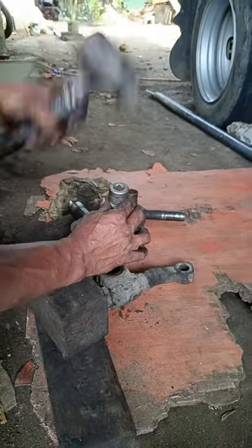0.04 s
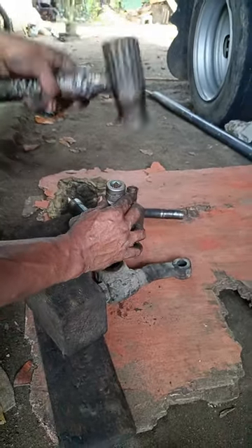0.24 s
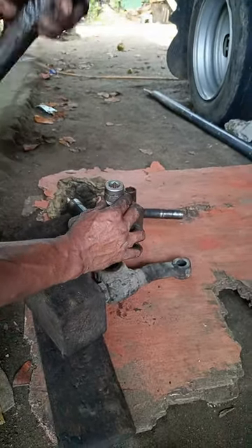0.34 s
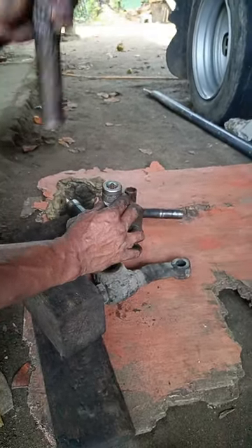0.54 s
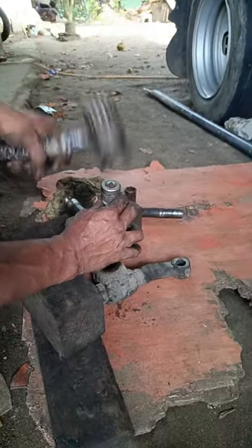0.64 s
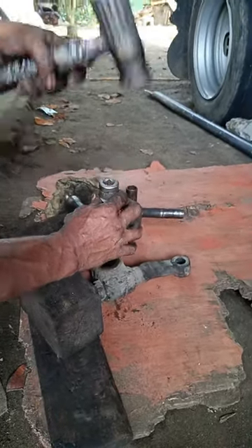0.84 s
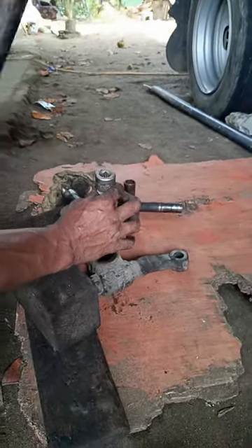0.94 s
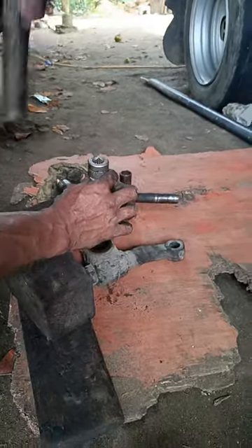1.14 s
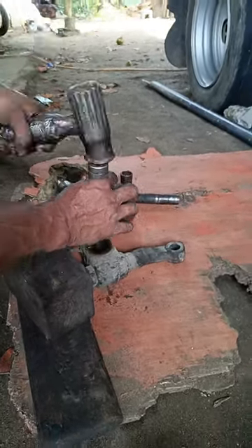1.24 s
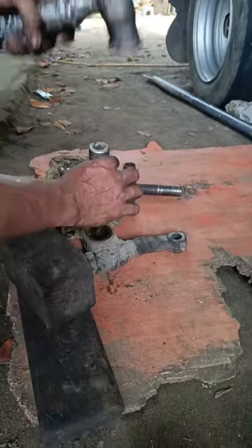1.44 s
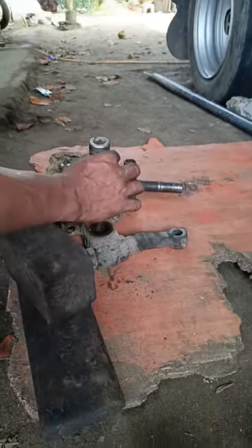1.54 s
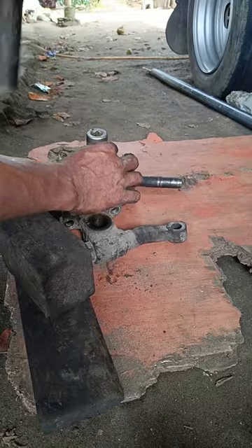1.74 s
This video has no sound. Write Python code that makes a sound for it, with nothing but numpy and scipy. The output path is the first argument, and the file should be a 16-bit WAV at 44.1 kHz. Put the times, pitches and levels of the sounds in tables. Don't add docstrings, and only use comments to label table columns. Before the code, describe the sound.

Three heavy hammer blows on a steel socket, at about 0.2, 0.8 and 1.4 seconds: each a loud, slightly overloaded crack with a falling zip, gritty rattle, low block boom and brief bright ring. The casting bounces with dull knocks, notably near 0.57. A faint bird chirps at 0.1; a loose tool clinks at 1.14. Wind thumps softly; short open-shed reverberation, background dipping around each blow.

```python
import sys
import numpy as np
from scipy import signal
from scipy.fft import rfft, irfft, next_fast_len
from scipy.io import wavfile
from scipy.ndimage import map_coordinates

SR = 44100
rng = np.random.default_rng(int(sys.argv[2]) if len(sys.argv) > 2 else 0)


def volts_from_decibels(level):
    exponent = np.asarray(level, float) / 20
    return 10 ** exponent


def wav_out(sig):
    wavfile.write(sys.argv[1], SR, np.round(np.clip(np.atleast_2d(sig).T, -1, 1) * 32767).astype(np.int16))


N = 79380


def unit(x):
    return x / np.sqrt(np.mean(x ** 2) + 1e-20)


def along(points, hz):
    f, v = np.transpose(points)
    return np.interp(np.log(hz + 1), np.log(f + 1), v)


def wobble(rate):
    knots = rng.standard_normal(int(N * rate / SR) + 4)
    return map_coordinates(knots, [np.arange(N) * rate / SR])


def filtered(x, response):
    m = next_fast_len(N + SR // 2)
    return irfft(rfft(x, m) * response(np.fft.rfftfreq(m, 1 / SR)), m)[..., :N]


def peak(hz, centre, width):
    return 1 / (1 + (2 * (hz - centre) / width) ** 2)


def dying(s, t60, rise):
    t = np.maximum(np.arange(N) / SR - s, 0)
    return (1 - np.exp(-t / rise)) * volts_from_decibels(-60 * t / t60)


# (frequency [Hz], likeness [0-1])
PORT_LIKENESS = [(100, 0.91), (350, 0.95), (800, 0.32), (3000, 0.027), (12000, 0.034)]


def noise(colour):
    def mid_side(hz):
        turn = np.arccos(np.clip(along(PORT_LIKENESS, hz), -1, 1)) / 2
        return colour(hz) * [np.cos(turn), np.sin(turn)]
    mid, side = filtered(rng.standard_normal((2, N)), mid_side)
    return unit(np.array([mid + side, mid - side]))


def ringing(s, modes, damp, rise, smear):
    rate, depth, spread_db = smear
    length_s, port_turn_hz = 0.6, 2560
    start, out = round(s * SR), np.zeros((2, N + SR))
    t = np.arange(int(length_s * SR)) / SR
    knots = np.arange(int(length_s * rate) + 2) / rate
    for hz, db, t60 in modes:
        a, b = depth * rng.standard_normal((2, len(knots)))
        shake = np.interp(t, knots, 1 + a + 1j * b) / np.sqrt(1 + depth ** 2)
        split = np.clip(hz / port_turn_hz, 0, 1) * rng.choice([-1, 1]) * np.array([[1], [-1]]) / 8
        ports = np.exp(2j * np.pi * (rng.random() + split))
        decay = np.log(1000) / (t60 * damp)
        tone = shake * np.exp((2j * np.pi * hz - decay) * t) * (1 - np.exp(-t / rise))
        level = volts_from_decibels(db + spread_db * np.tanh(rng.normal()))
        out[:, start:start + len(t)] += level * np.imag(ports * tone)
    return out[:, :N]


# (time [s], level [dB])
WIND_STRENGTH = [(0.0, -43), (0.234, -32.5), (0.28, -55), (0.476, -36.5), (0.55, -46), (0.686, -33),
                 (0.762, -45.5), (0.806, -8), (0.832, -48), (1.026, -29), (1.072, -38.5), (1.231, -27.5),
                 (1.252, -36.5), (1.318, -35), (1.342, -56), (1.382, -53), (1.408, -42), (1.8, -33.5)]
# (frequency [Hz], density [dB])
WIND_COLOUR = [(20, -42), (45, -10), (85, 5), (140, -0.5), (200, -10), (350, -20.5), (600, -42),
               (1200, -69)]
# (frequency [Hz], density [dB])
YARD_COLOUR = [(100, -24), (250, -1), (600, -10.5), (1100, -17.5), (2500, -20), (4500, -22.5), (6000, -32),
               (14000, -46)]
# (time [s], level [dB])
YARD_SWELL = [(0, 2), (.2, -1), (.55, 5), (.7, 2.5), (.8, 1), (1.3, 1), (1.8, 2)]


def air():
    t = np.arange(N) / SR
    left_db, lumps_db, yard_db, sway_db = 2.5, 2, -52.5, 1.2
    rumble = unit(filtered(rng.standard_normal((2, N)), lambda hz: volts_from_decibels(along(WIND_COLOUR, hz))))
    lumps = lumps_db * np.array([wobble(14), wobble(12.4)])
    wind_db = np.interp(t, *np.transpose(WIND_STRENGTH)) + lumps + [[left_db], [-left_db]]
    swell_db = yard_db + np.interp(t, *np.transpose(YARD_SWELL)) + sway_db * wobble(7.9)
    return volts_from_decibels(wind_db) * rumble + volts_from_decibels(swell_db) * noise(lambda hz: volts_from_decibels(along(YARD_COLOUR, hz)))


# (time [s], length [s], from [Hz], to [Hz], level [dB], octave level [dB])
BIRD_NOTES = [
    (.102, 0.016, 2620, 3170, -58.5, -7),
    (0.128, 0.044, 3050, 3220, -59, -16),
    (0.13, 0.026, 3300, 3390, -57, -4),
    (0.133, 0.051, 3735, 3900, -53.5, -14.5),
]


def bird():
    t, out = np.arange(N) / SR, np.zeros(N)
    for s, length, hz0, hz1, db, octave_db in BIRD_NOTES:
        u = np.clip((t - s) / length, 0, 1)
        glide = hz0 + (hz1 - hz0) * (1 - (1 - u) ** 2)
        phase = 2 * np.pi * np.cumsum(glide * (1 + 0.0358 * wobble(360))) / SR
        twelfth = 0.67 * np.sin(3 * phase) * (hz1 < 3300)
        voice = np.sin(phase) + volts_from_decibels(octave_db) * (np.sin(2 * phase) + twelfth)
        out += volts_from_decibels(db) * np.sqrt(np.abs(np.sin(np.pi * u))) * (u < 1) * voice
    return out


# (time [s], level [dB], pitch [Hz], t60 [s])
GUSTS = [
    (0.139, -26.5, 82, 0.15),
    (.668, -29.5, 108, 0.14),
    (0.729, -42, 102, 0.092),
    (0.931, -24, 89, 0.13),
    (1.207, -29, 90.3, 0.22),
    (1.301, -28, 86.5, .1),
]


def buffets():
    t, out, left_db = np.arange(N) / SR, np.zeros((2, N)), 9
    for s, db, hz, t60 in GUSTS:
        thump = np.sin(2 * np.pi * hz * (t - s + [[0], [0.003]]))
        out += volts_from_decibels(db) * thump * dying(s, t60, 0.0063)
    return out * volts_from_decibels([[left_db], [-left_db]])


DUCK_DB = 19
# (time [s], peak [dB], gain control lead [s], rattle t60 [s], steel left to ring [0-1])
BLOWS = [
    (0.2059, -10, 0.029, 0.21, 0.89),
    (0.7874, -9, 0.027, 0.19, 0.92),
    (1.37, -10.5, .014, 0.21, 0.95),
]
# (centre [Hz], width [Hz], level [dB], t60 [s])
CRACKS = [(2060, 3200, -3.5, 0.077), (1360, 1800, -3.5, 0.044), (1460, 2300, -5.5, 0.042)]
# (from [Hz], to [Hz], level [dB], t60 [s])
ZIPS = [(5820, 2320, 2.5, .01), (5870, 2420, 4, 0.014), (5560, 2970, 4.5, 0.013)]
# (frequency [Hz], density [dB])
RATTLE_COLOUR = [(60, -39), (150, -1.5), (400, 4), (1140, -9), (1700, -13), (4140, -9.5), (9210, -18),
                 (16000, -40)]
# (frequency [Hz], width [Hz], level [dB])
PARTS = [(1178, 234, 12.5), (2173, 128, 14), (2720, 490, 8.5), (3420, 130, 8), (4330, 500, 6),
         (4900, 400, -12), (6720, 92, -26), (9100, 1600, 8), (14600, 1250, 17.5)]
# (frequency [Hz], level [dB], t60 [s])
BLOCK_MODES = [(190.4, -12, 0.305), (249.8, -12.5, 0.49), (313, 2, 0.41), (351.9, 2.5, 0.46),
               (421.7, 5.5, 0.37), (511.4, -4.5, 0.41), (580, -1, 0.17), (794, -6, 0.33)]
BLOCK_BLOW_DB = [-0.5, -2.5, -2.5]
# (rate [1/s], depth [ratio], level spread [dB])
BLOCK_SMEAR = (40, 1.6, 3)


def hammer():
    rattle_db, grit_db, grit_rate, block_db = -2, 3, 500, -19.5
    settle, settle_s = 0.34, 0.0084
    zip_fall_s = 0.00194

    def colour(hz):
        parts = sum(volts_from_decibels(db) * peak(hz, centre, width) for centre, width, db in PARTS)
        return volts_from_decibels(along(RATTLE_COLOUR, hz)) * (1 + parts)

    out = np.zeros((2, N))
    for blow, contact, bend, boom_db in zip(BLOWS, CRACKS, ZIPS, BLOCK_BLOW_DB):
        s, db, ahead, t60, ring = blow
        centre, width, crack_db, crack_t60 = contact
        hz0, hz1, zip_db, zip_t60 = bend
        t = np.maximum(np.arange(N) / SR - s, 0)
        turns = hz1 * t + (hz0 - hz1) * zip_fall_s * (1 - np.exp(-t / zip_fall_s))
        sweep = np.sin(2 * np.pi * turns + [[0.6], [-0.6]]) * dying(s, zip_t60, 0.00037)
        crack = noise(lambda hz: peak(hz, centre, width)) * dying(s, crack_t60, 0.0006)
        builds = 1 - settle * np.exp(-t / settle_s)
        grit = volts_from_decibels(rattle_db + grit_db * wobble(grit_rate))
        rattle = grit * noise(colour) * dying(s, t60, 0.00028) * builds
        boom = volts_from_decibels(block_db + boom_db) * ringing(s, BLOCK_MODES, 0.97, 0.0052, BLOCK_SMEAR)
        out += volts_from_decibels(db + DUCK_DB) * (volts_from_decibels(zip_db) * sweep + volts_from_decibels(crack_db) * crack + rattle + boom)
    return out


# (frequency [Hz], t60 [s], blow 1 level [dB], blow 2 level [dB], blow 3 level [dB])
STEEL_MODES = [(1193, 0.41, -5, -9, -11.5), (2158, 0.39, -1, -4.5, -12), (2463, 0.38, -2, 3, -4.5),
               (2815, 0.32, -8, -6, -2), (2882, 0.43, -4, -3.5, -3.5), (3437, 0.49, -5.5, -14, -5),
               (3900, .25, -23, -23, -10), (4240, 0.48, -3, -2.5, 0), (4815, 0.33, -7, 0, -3),
               (5470, .2, -15.5, -10, -16), (5890, 0.39, -10, -13, -14), (6090, 0.37, -11, -19, -13),
               (6815, .22, -22, -16, -26), (8850, .22, -14, -18, -20)]
# (rate [1/s], depth [ratio], level spread [dB])
STEEL_SMEAR = (50, .45, 0)


def socket():
    steel_db, damp = -16, 0.91
    out = np.zeros((2, N))
    for k, (s, db, ahead, t60, ring) in enumerate(BLOWS):
        modes = [(hz, levels[k], long) for hz, long, *levels in STEEL_MODES]
        out += volts_from_decibels(db + DUCK_DB + steel_db) * ringing(s, modes, damp * ring, 0.0053, STEEL_SMEAR)
    return out


# (time [s], peak [dB], pitch [Hz], tick level [dB], t60 [s])
LANDINGS = [(0.2094, -6, 224.5, -17, 0.034), (.2198, -5, 895, -20, 0.0067), (0.2356, -2.5, 359, -32, 0.025),
            (.281, -14.5, 358, -44.5, .04), (.457, -26, 332, -42, 0.043), (.503, -23.5, 337, -40, 0.034),
            (0.5668, -16, 299, -16, .045), (0.6229, -19, 332, -22.5, 0.057), (.651, -23, 353, -47, 0.051),
            (.672, -28, 293, -40, 0.048), (0.7922, -15.5, 304, -32, 0.036), (0.8174, -4.5, 368, -25, 0.02),
            (0.8246, -4, 347, -22, .02), (.927, -16, 360, -40, 0.039), (1.02, -24.5, 300, -40, 0.036),
            (1.3789, -13, 238, -24, 0.028), (1.3925, -13, 402, -30, 0.026), (1.401, -12, 378, -30, 0.037),
            (1.421, -16, 342, -35, 0.034), (1.479, -15, 339, -40.5, 0.032)]


def arm():
    lag_s, tick_hz, tick_width_hz = 0.00021, 2300, 1900
    t = np.arange(N) / SR + [[lag_s], [-lag_s]]
    duck_db = ducking_db()
    knocks, ticks = np.zeros((2, 2, N))
    for s, db, hz, tick_db, t60 in LANDINGS:
        turn = 2 * np.pi * hz * (t - s)
        gain = volts_from_decibels(db - duck_db[round(s * SR)])
        body = np.sin(turn) + 0.5 * np.sin(1.615 * turn) + 0.41 * np.sin(0.698 * turn)
        knocks += gain * body * dying(s, t60, 0.00098)
        ticks += gain * volts_from_decibels(tick_db) * dying(s, 0.062, 0.00037)

    def tick_colour(hz):
        return 1 / (1 + ((hz - tick_hz) / tick_width_hz) ** 2) / (1 + (hz / 7000) ** 4)

    return knocks + filtered(ticks * rng.standard_normal((2, N)), tick_colour)


# (frequency [Hz], t60 [s])
SHED_DECAY = [(150, 0.34), (400, 0.33), (1200, 0.34), (4000, 0.36), (9000, 0.33), (15000, 0.2)]


def shed(x):
    hz, t, z = signal.stft(noise(lambda f: f > 60)[:, :SR // 2], SR, nperseg=256)
    fade = volts_from_decibels(-60 * t / along(SHED_DECAY, hz)[:, None])
    tail = signal.istft(z * fade, SR, nperseg=256)[1]
    return signal.fftconvolve(x.mean(axis=0)[None], tail / np.linalg.norm(tail[0]), axes=1)[:, :N]


# (frequency [Hz], level [dB], t60 [s])
CLINK_MODES = [(1564, -3.5, 0.079), (1682, 2, 0.069), (2200, 4.5, 0.07), (2360, 1.5, 0.12),
               (3300, -7, 0.28), (4560, -6, 0.19), (4690, -9.5, 0.19), (6200, -9, 0.15), (7200, -3, 0.11),
               (8000, -8, .1), (8740, -4, 0.086), (10500, -13, 0.14), (13700, -19, 0.13), (15000, -9, .15)]
# (frequency [Hz], density [dB])
CLINK_COLOUR = [(900, -45), (1400, -2.5), (2300, -1.5), (4500, 1), (5800, -9), (8000, 0), (11000, -15.5),
                (16000, -26)]
# (rate [1/s], depth [ratio], level spread [dB])
CLINK_SMEAR = (150, 1.9, 2)


def clink():
    touch_s, touch_db, touch_hz, touch_t60 = 1.138, -31, 7400, 0.083
    strike_s, strike_db, rise_s, hiss_db, hiss_t60 = 1.1455, -31, 0.0036, 1.5, 0.16
    touch = noise(lambda hz: peak(hz, touch_hz, 1800)) * dying(touch_s, touch_t60, 0.004)
    scrape = volts_from_decibels(2.3 * wobble(300)) * noise(lambda hz: volts_from_decibels(along(CLINK_COLOUR, hz)))
    hiss = scrape * dying(strike_s, hiss_t60, rise_s)
    tones = ringing(strike_s, CLINK_MODES, 0.97, rise_s, CLINK_SMEAR)
    return volts_from_decibels(touch_db) * touch + volts_from_decibels(strike_db) * (volts_from_decibels(hiss_db) * hiss + tones)


# (frequency [Hz], left minus right [dB])
PORT_LEAN = [(60, -5), (180, 0.5), (550, 3.5), (1650, -5.5), (4970, -5.5), (15000, 3.5)]


def scene():
    wind, call, gusts = air(), bird(), buffets()
    steel, ring, low = hammer() + clink(), socket(), arm()
    work = steel + ring + low
    work = work + volts_from_decibels(-17) * shed(ring) + volts_from_decibels(-8) * shed(steel) + volts_from_decibels(-6) * shed(low)
    work = filtered(work, lambda hz: volts_from_decibels(along(PORT_LEAN, hz) * np.array([[0.5], [-0.5]])))
    return work + call + volts_from_decibels(7.5) * shed(call[None]) + wind + gusts


def ducking_db():
    fall_s, hold_s, back_s = 0.01, 0.056, 0.15
    t, total = np.arange(N) / SR, np.zeros(N)
    for s, db, ahead, t60, ring in BLOWS:
        corners = np.cumsum([-ahead, fall_s, abs(ahead - fall_s) + hold_s, back_s])
        total += np.interp(t - s, corners, [0, -DUCK_DB, -DUCK_DB, 0])
    return total


def band_limit(x):
    return signal.sosfilt(signal.butter(12, 16530, fs=SR, output="sos"), x)


def record(dry):
    limit, knee, low_hz, top_hz = 0.88, 3, 45, 16400
    x = dry * volts_from_decibels(ducking_db())
    x = x / (1 + np.abs(x / limit) ** knee) ** (1 / knee)
    mix = filtered(x, lambda hz: (hz < top_hz) * (1j * hz / (low_hz + 1j * hz)) ** 2)
    return band_limit(mix)


dry = scene()
out = record(dry)
wav_out(out)
```